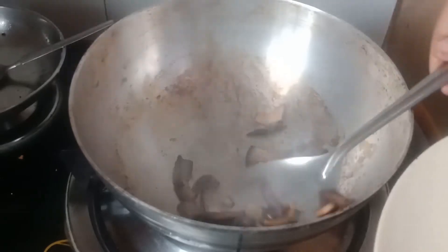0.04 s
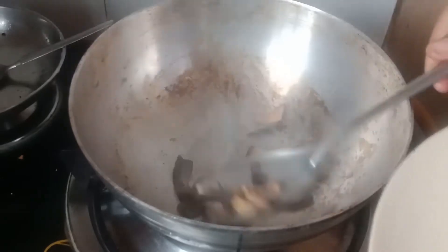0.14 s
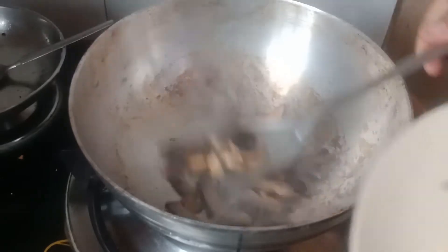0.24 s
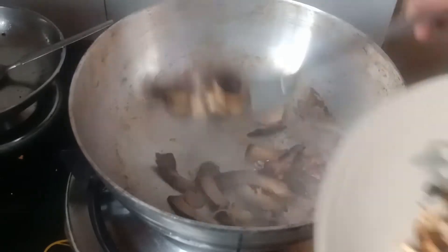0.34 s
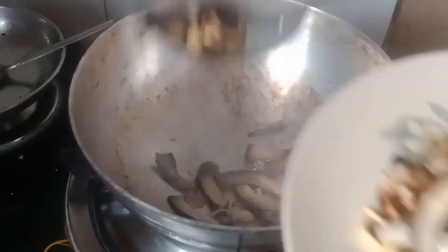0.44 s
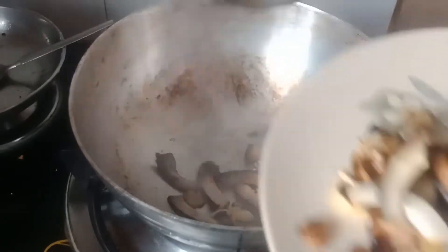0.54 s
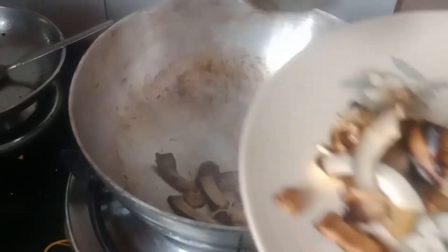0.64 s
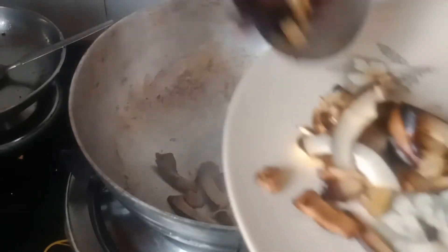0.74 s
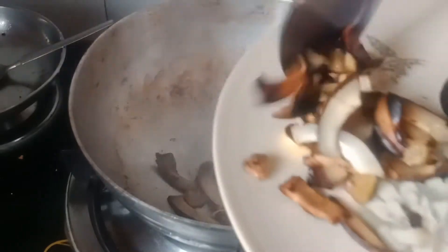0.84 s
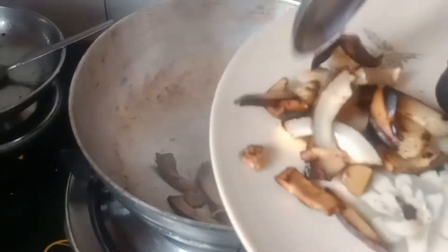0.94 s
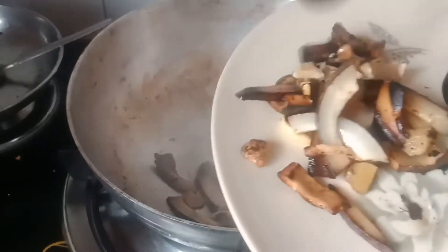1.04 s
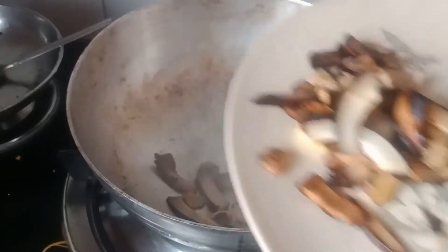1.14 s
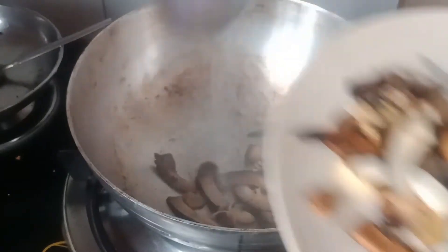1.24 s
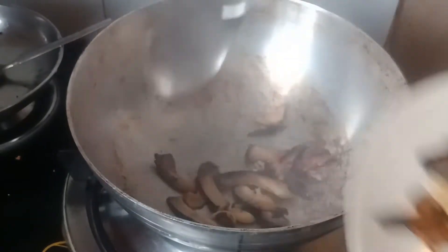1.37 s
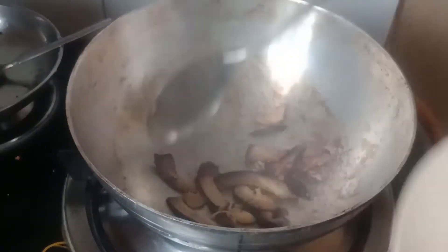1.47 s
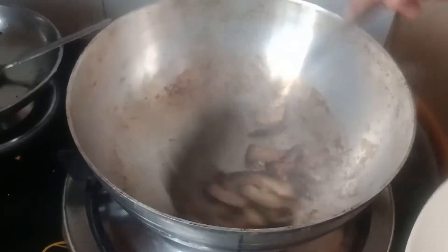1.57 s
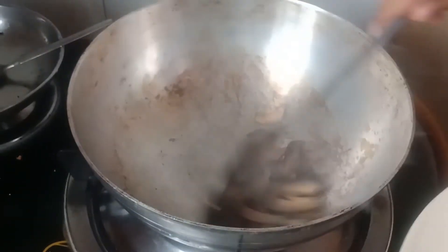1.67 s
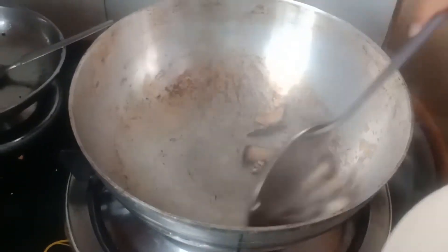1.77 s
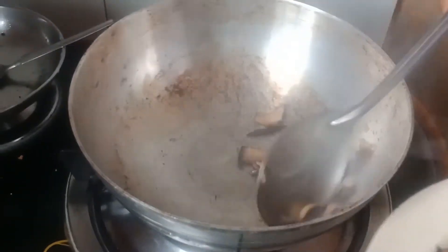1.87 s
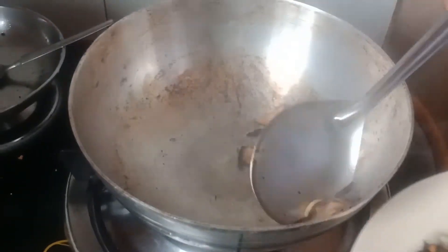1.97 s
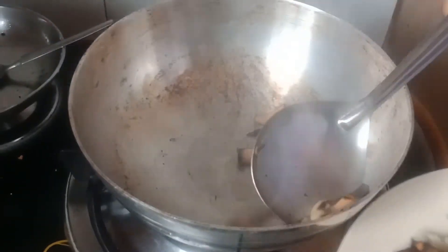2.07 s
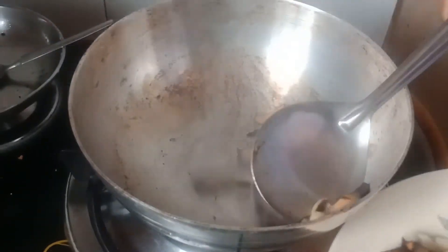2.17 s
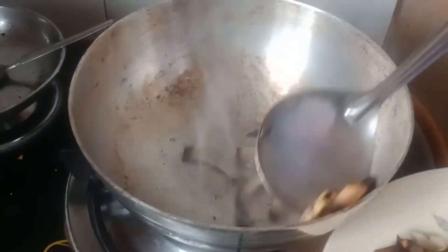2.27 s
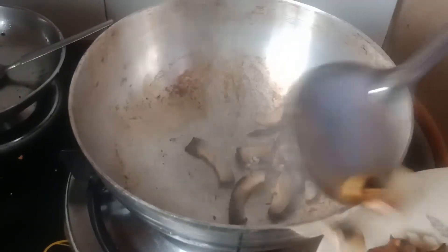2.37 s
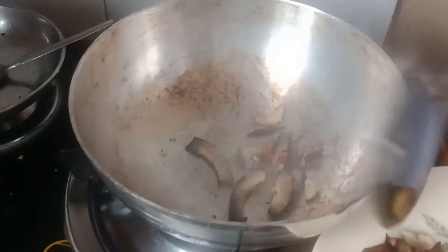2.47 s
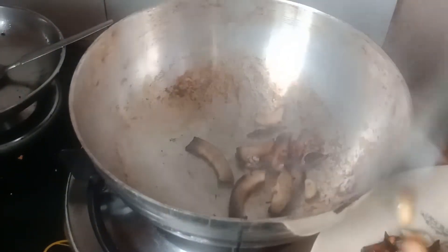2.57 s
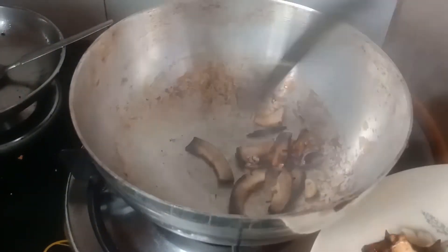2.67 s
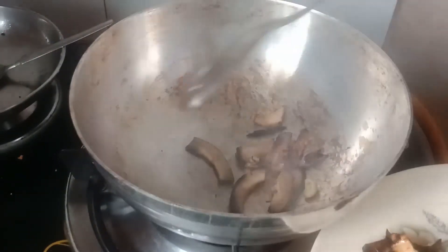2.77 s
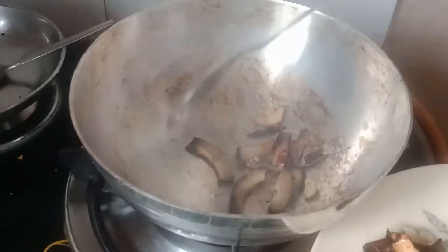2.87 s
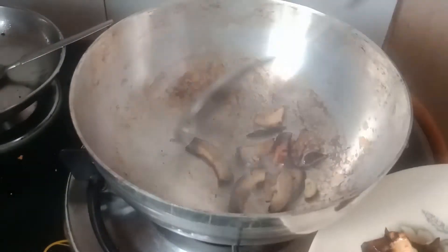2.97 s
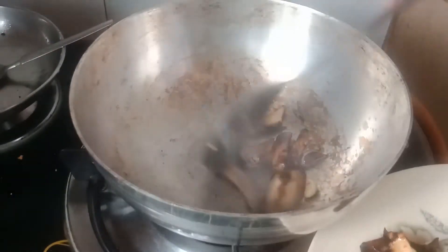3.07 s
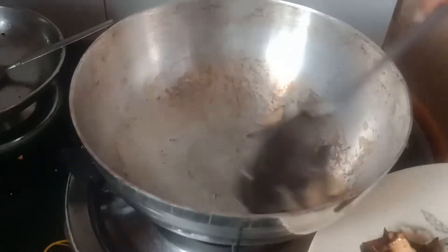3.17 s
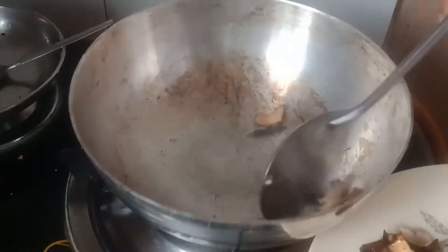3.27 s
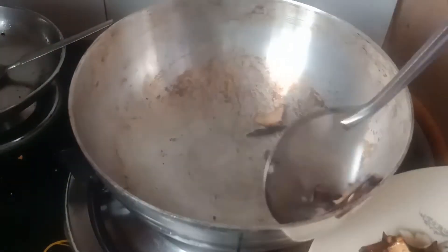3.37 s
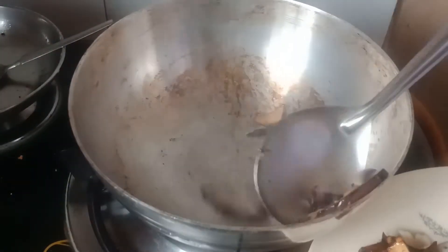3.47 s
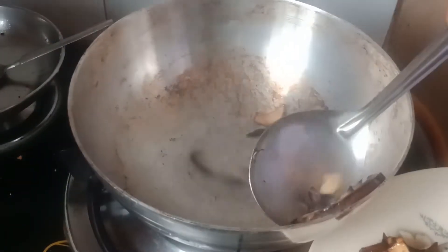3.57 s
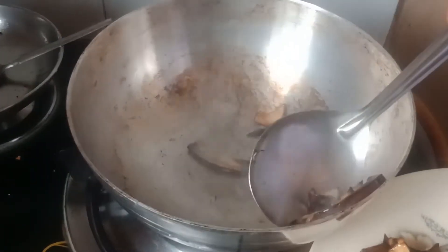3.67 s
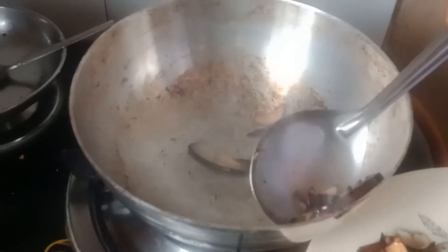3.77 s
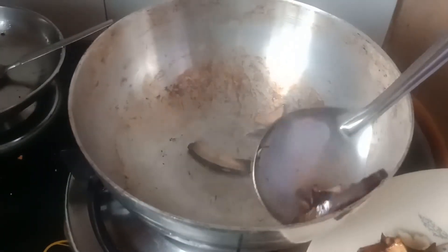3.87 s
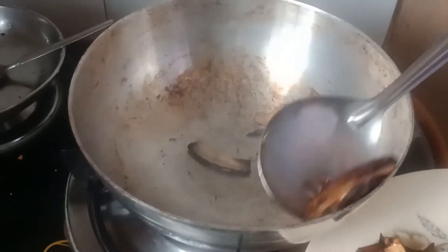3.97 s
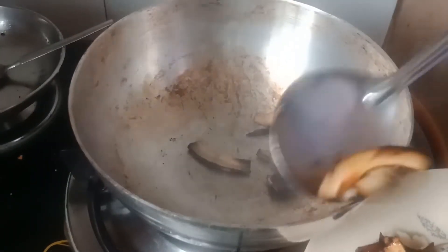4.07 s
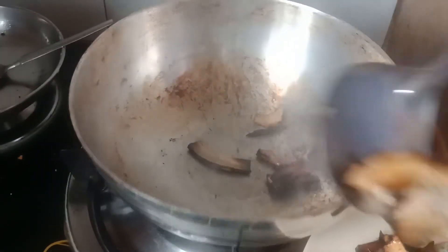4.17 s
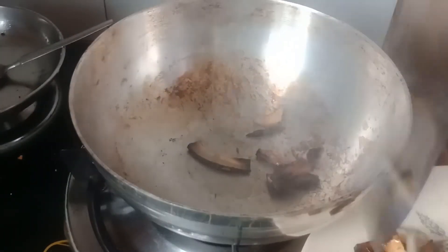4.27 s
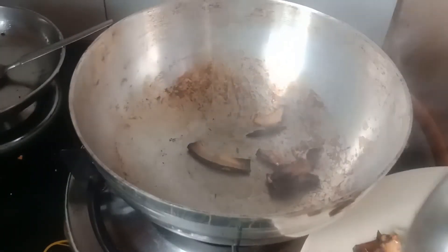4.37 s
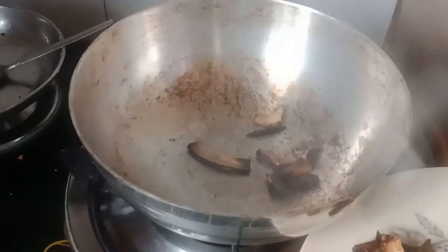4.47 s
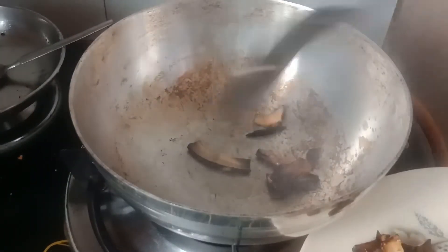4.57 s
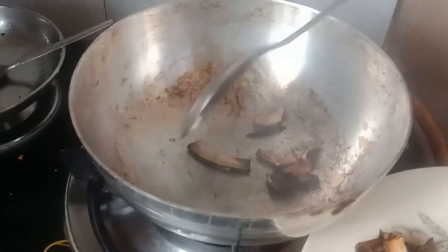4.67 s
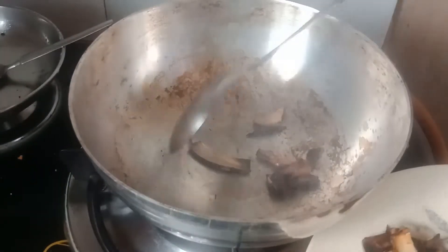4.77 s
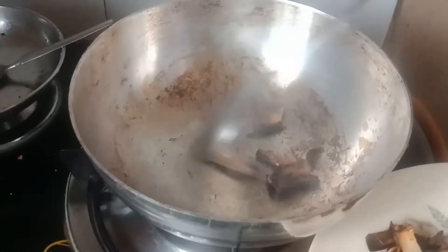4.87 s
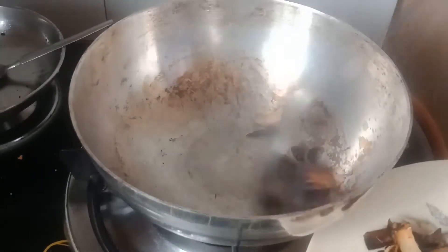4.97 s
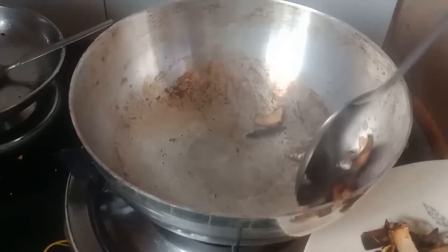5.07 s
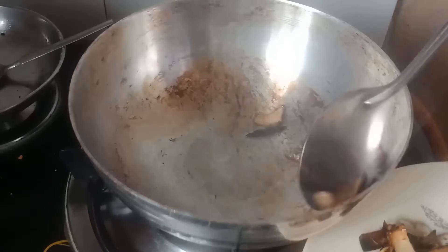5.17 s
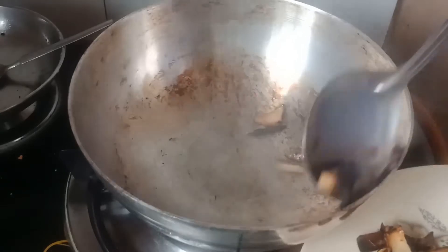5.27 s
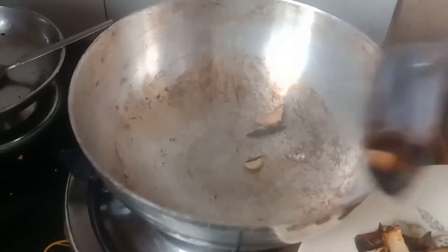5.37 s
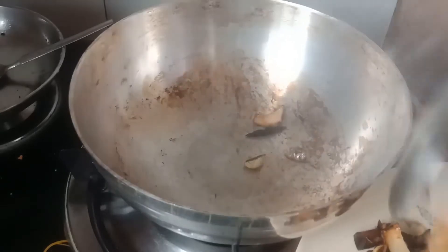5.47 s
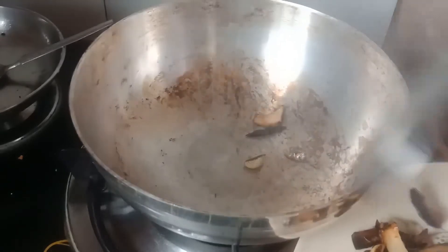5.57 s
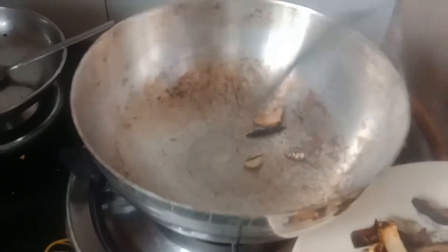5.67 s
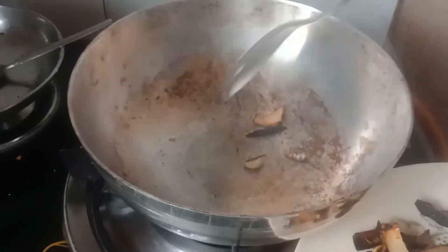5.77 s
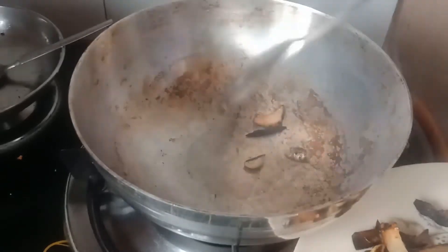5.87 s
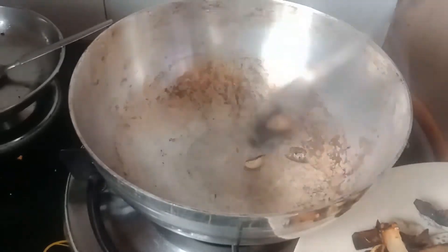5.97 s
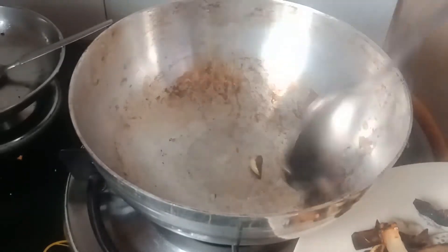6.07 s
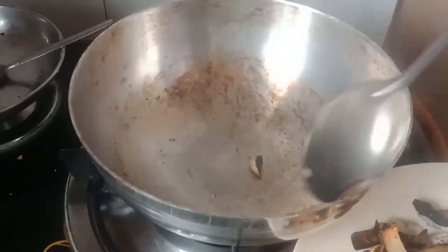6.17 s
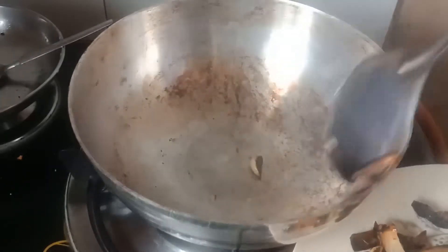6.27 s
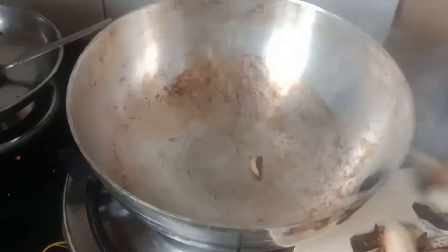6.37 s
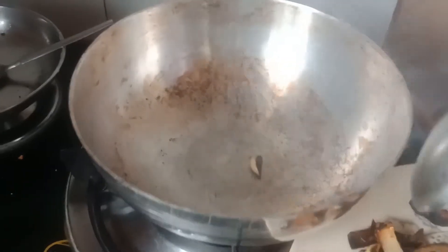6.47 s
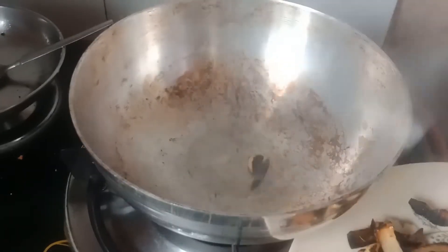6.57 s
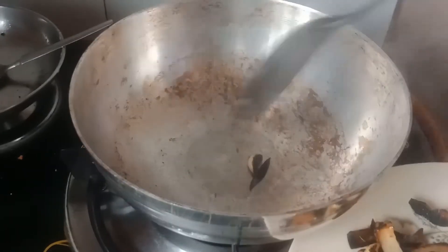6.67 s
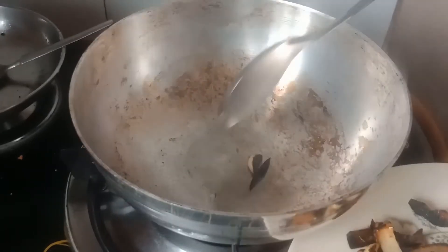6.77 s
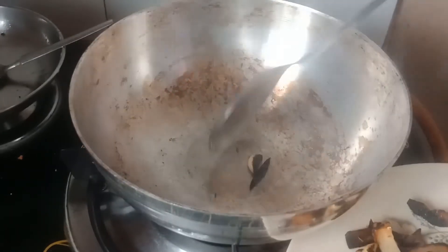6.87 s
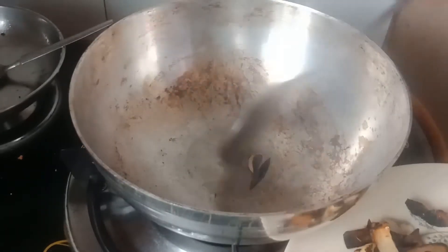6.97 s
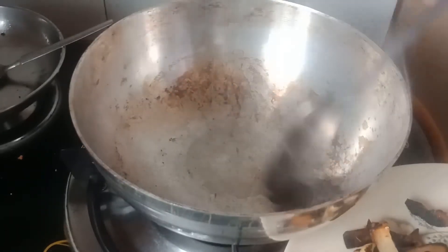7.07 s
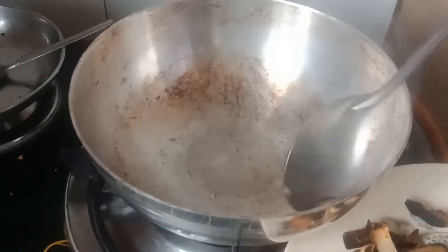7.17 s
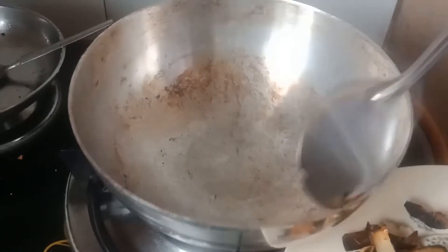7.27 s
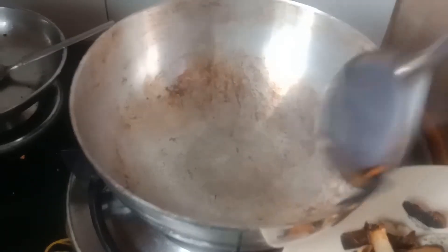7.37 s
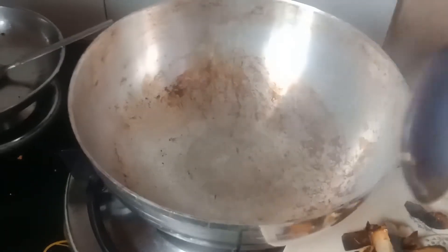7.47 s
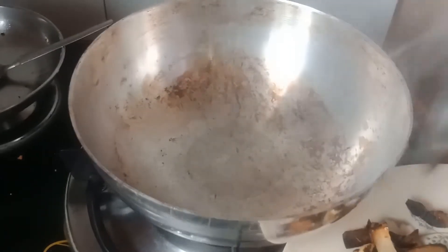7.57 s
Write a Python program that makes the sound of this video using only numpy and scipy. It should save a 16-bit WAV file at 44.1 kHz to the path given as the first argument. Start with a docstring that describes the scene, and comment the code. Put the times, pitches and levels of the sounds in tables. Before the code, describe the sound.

A metal utensil scrapes the bottom of a metal pan, recorded near in stereo with little room sound. After a soft opening scrape and a few light taps, seven seconds bring a series of strokes: sharp clank, stuttering rasp, upward metallic scratch, then a knock on the rim or a dull thud on a plate. Strokes grow busier and brighter around five to six seconds, and a final scrape fades into faint room hum.

```python
"""In a small kitchen, a steel spatula scrapes fried food out of a thin round metal pan.
Most strokes land with a clink, then the edge stutters over the crust: random slips and grit drive
the pan and blade, which ring briefly. A low pan tone rings at the opening; later drags climb in pitch.
Between strokes the spatula knocks on the rim and rattles to rest, and dull knocks set off a few
heavily damped plate modes. Under it all lies a quiet room hum of shaped noise."""
import sys
import numpy as np
from scipy import signal
from scipy.fft import rfft, irfft, next_fast_len
from scipy.io import wavfile

SR = 44100
rng = np.random.default_rng(int(sys.argv[2]) if len(sys.argv) > 2 else 0)


def convert_level_to_amplitude(level_db):
    """Map a level in decibels to its linear amplitude factor."""
    exponent = np.asarray(level_db, float) / 20
    return 10 ** exponent


def transcribe(u):
    """Save the signal u as a 16-bit wav file named by the first command-line argument.

    u: samples, shape (n,) or (channels, n), limited to [-1, 1]; the rate is SR.
    q: integer samples, one column per channel.
    """
    v = np.clip(np.atleast_2d(u).T, -1, 1)
    q = np.round(v * 32767).astype(np.int16)
    wavfile.write(sys.argv[1], SR, q)


N = 336914   # length in samples


def rms_one(x):
    """Scale to rms 1."""
    return x / np.sqrt(np.mean(x ** 2) + 1e-20)


def at_hz(points, hz):
    """Read a (frequency, value) table on a log frequency axis."""
    f, value = np.transpose(points)
    return np.interp(np.log(np.maximum(hz, 1)), np.log(np.maximum(f, 1)), value)


def drift(rate_hz):
    """A slow random wander of spread 1: noise smoothed by two equal poles, made at SR / 40."""
    pole = np.exp(-2 * np.pi * rate_hz * 40 / SR)
    noise = rng.standard_normal(N // 40 + 2002)
    slow = signal.lfilter([1], [1, -2 * pole, pole * pole], noise)[2000:]   # skip the start-up
    return np.interp(np.arange(N) / 40, np.arange(len(slow)), rms_one(slow))


def stereo(mid, side, width_db, lean_db):
    """Left and right spectra from mid and side; half the lean goes to each ear."""
    both = mid + convert_level_to_amplitude(width_db) * side * [[1], [-1]]
    return both * convert_level_to_amplitude(lean_db * np.array([[0.5], [-0.5]]))


def causal(gain):
    """The minimum-phase spectrum with this magnitude: nothing sounds early."""
    cepstrum = irfft(np.log(gain + 1e-6))
    cepstrum[1:len(gain) - 1] *= 2
    cepstrum[len(gain):] = 0
    return np.exp(rfft(cepstrum))


# colour of the room noise: (frequency [Hz], relative density [dB])
HUM_COLOUR = [(15, -73.5), (25, -36), (64, -21.5), (97, 3.5), (127, -8), (180, -4), (309, -15), (394, -7),
              (489, -17.5), (677, -11.5), (1130, -17.5), (1940, -18.5), (2160, -21), (3250, -21.5),
              (16000, -46)]
# how wide the room noise is: (frequency [Hz], side minus mid [dB])
HUM_WIDTH = [(60, -16), (110, -9.5), (200, -9), (380, -7), (700, -5), (1290, -1), (2380, -1.5),
             (4400, -0.5), (8120, -1.5), (15000, 0)]
HUM_DB = -60   # rms of the mid of the room noise, its slow wander included


def hum():
    """Coloured room noise that wanders slightly in level; its bass comes in quicker lumps."""
    hz = np.fft.rfftfreq(N, 1 / SR)
    mid, side = rfft(rng.standard_normal((2, N))) * convert_level_to_amplitude(at_hz(HUM_COLOUR, hz))
    air = irfft(stereo(mid, side, at_hz(HUM_WIDTH, hz), 0 * hz), N)
    bass = signal.sosfilt(signal.butter(2, 150, fs=SR, output="sos"), air)
    air = (air - bass) * convert_level_to_amplitude(1.1 * drift(1)) + bass * convert_level_to_amplitude(1.2 * drift(8))
    return convert_level_to_amplitude(HUM_DB) * air / np.std(air.mean(axis=0))


# dull knocks on the plate: (time [s], strength [dB])
KNOCKS = [(4.238, -24), (4.29, -4.5), (4.301, -8), (5.553, -5.5), (6.606, -4)]
# resonances of the plate: (frequency [Hz], width [Hz], level [dB])
PLATE_MODES = [(210, 14, -27), (565, 52, -8), (784, 51, -18)]


def plate():
    """A soft knock sets a few heavily damped modes going."""
    clicks, out = np.full(N, 1e-18), 0
    for s, strength_db in KNOCKS:
        clicks[int(s * SR)] = convert_level_to_amplitude(strength_db)
    for hz, width_hz, level_db in PLATE_MODES:
        r = np.exp(-np.pi * width_hz / SR)
        w = 2 * np.pi * hz / SR
        poles = [1, -2 * r * np.cos(w), r * r]
        out = out + signal.lfilter([0, convert_level_to_amplitude(level_db) * np.sin(w)], poles, clicks)
    return signal.sosfilt(signal.butter(2, [150, 1000], "band", fs=SR, output="sos"), out)


SLIPS_PER_S, SLIP_SPREAD_DB = 300, 3   # typical rate and spread of the slips
GRIT_DB = -1   # grit relative to slips


def stutter():
    """The edge sticks and slips over the crust in clumps, on a bed of fine grit."""
    sizes = convert_level_to_amplitude(SLIP_SPREAD_DB * np.minimum(rng.exponential(1, N), 4)) * rng.choice([-1, 1], N)
    chance = SLIPS_PER_S * convert_level_to_amplitude(3.0 * drift(25)) / SR
    slips = sizes * (rng.random(N) < chance)
    return rms_one(rms_one(slips) + convert_level_to_amplitude(GRIT_DB) * rng.standard_normal(N))


# first row: a low pan tone rings as the sound opens;
# the others: the edge drags and its scratch climbs in pitch:
# (start [s], end [s], from [Hz], to [Hz], peak level [dB], sharpness [Q])
DRAGS = [(0, 0.15, 444, 454, -38.5, 41), (1.736, 1.86, 1490, 2180, -38, 3.7),
         (3.425, 3.556, 2480, 2720, -35, 5.4), (3.955, 4.216, 1730, 4600, -39, 2.5),
         (5.108, 5.182, 2300, 2900, -25, 3), (5.217, 5.287, 2530, 2900, -26, 3.2),
         (6.168, 6.367, 2040, 3490, -22.5, 4.4), (7.199, 7.488, 1900, 4770, -25, 9)]
# where in its length a row peaks, and how far below the peak it starts and ends
DRAG_PEAK_SHARE, DRAG_RISE_DB, DRAG_FALL_DB = 0.6, 15.5, 11.5
RIGHT_EAR_DELAY_S = 0.0004


def drags(force):
    """The stutter rings a resonance whose centre glides from one pitch to another; the right ear lags."""
    out = np.zeros(N)
    for start, end, from_hz, to_hz, peak_db, sharpness in DRAGS:
        state = np.zeros(2)
        for i in range(int(start * SR), int(end * SR), 128):   # retuned every 128 samples
            way = np.clip((i / SR - start) / (end - start), 0, 1)
            hz = from_hz * (to_hz / from_hz) ** way
            r = np.exp(-np.pi * hz / sharpness / SR)
            fade = min(1, (i / SR - start) / 0.016, (end - i / SR) / 0.035)
            below_peak_db = np.interp(way, [0, DRAG_PEAK_SHARE, 1], [DRAG_RISE_DB, 0, DRAG_FALL_DB])
            # the root keeps the loudness alike for every sharpness
            gain = max(fade, 0) * convert_level_to_amplitude(peak_db - below_peak_db) * np.sqrt((1 - r * r) / 2)
            poles = [1, -2 * r * np.cos(2 * np.pi * hz / SR), r * r]
            piece = force[i:i + 128]
            out[i:i + 128], state = signal.lfilter([gain, 0, -gain], poles, piece, zi=state)
    out = signal.sosfilt(signal.butter(2, [400, 6000], "band", fs=SR, output="sos"), out)
    return np.array([out, np.roll(out, int(RIGHT_EAR_DELAY_S * SR))])


BOTTOM_DB, BOTTOM_FOLLOWS_BOWL = -7, 0.23   # the flat bottom under a scrape
EDGE_DB, EDGE_FOLLOWS_RASP, EDGE_FOLLOWS_BLADE = -6.5, 0.3, 0.26   # the fine hiss of the edge


def part_levels(wall_db, rasp_db, bowl_db, blade_db):
    """Drive in dB of bottom, bowl, wall, rasp, blade and edge; all but the wall given relative to it."""
    bottom_db = BOTTOM_DB + BOTTOM_FOLLOWS_BOWL * bowl_db
    edge_db = EDGE_DB + EDGE_FOLLOWS_RASP * rasp_db + EDGE_FOLLOWS_BLADE * blade_db
    return wall_db + np.array([bottom_db, bowl_db, 0 * wall_db, rasp_db, blade_db, edge_db])


# scrapes, a list of points for each stroke:
# (time [s], wall level [dB], then above the wall: rasp [dB], bowl [dB], blade [dB])
STROKES = [
    [(0.0, -41, 1, 1, -4), (0.016, -52, -5, 13, -3), (0.036, -51.5, 3, 9, 0), (0.102, -56.5, 8, 7, -14.5),
     (0.108, -54.5, -8, -7, -14), (0.162, -68, -5, 8, -3), (0.174, -59, -9, 0, -14),
     (0.192, -84, -4, 14, 1), (0.2, -73, -13, 3, -10)],
    [(1.6, -29.5, -9, -12, -15), (1.632, -34, -5, -2, 7), (1.718, -31.5, -17, -10, 0),
     (1.732, -33, -20, 0, 10), (1.75, -27.5, -17, -6.5, -3), (1.784, -19, 0.5, -23, -32),
     (1.804, -26.5, -0.5, -7, -23), (1.936, -53, -0.5, -9, -20.5), (2.02, -64.5, 2, 0, -3)],
    [(3.02, -26.5, -17, -10, -4), (3.122, -26.5, -3, -13.5, 0), (3.222, -27, 1, -9, 5),
     (3.244, -31.5, -3.5, -5, 15), (3.338, -22, -2, -9, -10), (3.38, -30, 2.5, 2, -22.5),
     (3.5, -29.5, 10.5, -3.5, -2), (3.534, -31, 1.5, 2.5, -34.5), (3.72, -71.5, -8, -12, -3)],
    [(3.92, -55.5, -12, -9.5, -22), (4.018, -41, 6, 6.5, -14), (4.052, -40, 7.5, 2, -2.5),
     (4.142, -37.5, 0, -2, 0), (4.182, -47, 15, 8, 3), (4.194, -49.5, -5, -6, -10), (4.226, -53.5, 5, 8, 0),
     (4.24, -42.5, -13, 4, -12), (4.27, -61.5, 3, 12, 8)],
    [(4.885, -26, -11.5, -10, -5), (4.911, -34, -9, -5, 7.5), (5.001, -27, 6, -20.5, 1.5),
     (5.051, -38.5, 3, -2, 17.5), (5.117, -21, 3, -9.5, -5), (5.199, -39.5, 8, 12, -9.5),
     (5.235, -28.5, 13, -1, -1.5), (5.381, -43.5, -19, 4.5, -13.5), (5.4, -43.5, -4, -1, -14)],
    [(5.963, -29.5, -5.5, -12, -9), (6.007, -26, -1.5, -4, -25.5), (6.075, -29.5, -12, -7.5, -4),
     (6.149, -27.5, -1.5, -7, -20), (6.243, -27, 14.5, 9, -1), (6.305, -35.5, 13, 2.5, 4.5),
     (6.443, -67.5, 8, 13, 4.5), (6.455, -46, -8, 5, -16), (6.56, -75.5, 8, 12, -7)],
    [(7.005, -32, 2, -8, 9.5), (7.033, -35, 6.5, -8, 6.5), (7.065, -31.5, 0.5, -26, -4),
     (7.149, -34, -2.5, -2, 6), (7.245, -32, 10, 5, -13.5), (7.301, -29.5, 10.5, 1, -2),
     (7.409, -33, 6, 2, 2), (7.531, -50.5, -2, 6.5, -4), (7.64, -106, 12, 2, 0)],
]
# after a knock the spatula rattles and slides to rest:
# (start [s], length [s], wall level [dB], fall [dB per s], rasp above wall [dB], bowl above wall [dB])
RATTLES = [(2.065, 0.07, -64.5, 42, 5.5, 1.5), (2.438, 0.18, -54, 39, -5, 2),
           (2.73, 0.097, -47, 68, -8, 2.5), (2.842, .15, -47, 103, -11, 1),
           (4.289, 0.24, -28.5, 191.5, -9.5, 4.5), (5.416, 0.11, -46.5, 228, 5.5, 18.5),
           (5.533, 0.029, -33.5, 26, -6, 4), (5.564, 0.3, -32.5, 130, -9.5, 0),
           (6.577, 0.027, -48.5, 20, -5, 7), (6.609, 0.21, -28, 196, -15, -0.5)]
RATTLE_BLADE_BELOW_RASP_DB = 7.5


def pressure():
    """Drive of each part over time; nothing while the spatula is in the air."""
    t, out = np.arange(N) / SR, np.zeros((len(PARTS), N))
    rattles = []
    for start, length, db, fall, rasp_db, bowl_db in RATTLES:
        blade_db = rasp_db - RATTLE_BLADE_BELOW_RASP_DB
        rattles.append([(start + late_s, db - fall * late_s, rasp_db, bowl_db, blade_db)
                        for late_s in (0, length)])
    for stroke in STROKES + rattles:
        s, *levels = np.transpose(stroke)
        inside = (t >= s[0]) & (t <= s[-1])
        out[:, inside] += convert_level_to_amplitude(part_levels(*[np.interp(t[inside], s, db) for db in levels]))
    return out


# clear resonances of the pan: (frequency [Hz], width [Hz], level [dB])
PAN_MODES = [(186, 20, -20), (239, 16, -4), (288, 12, -3), (381, 13, 0), (455, 14, -10), (553, 18, -8),
             (608, 16, -8), (675, 20, -9), (770, 20, -10), (845, 18, -8), (948, 16, -9), (1050, 25, -11),
             (1115, 25, -12), (1413, 25, -13), (1500, 22, -12), (1590, 20, -8), (1618, 20, -8),
             (1752, 25, -12), (1915, 25, -11), (2186, 25, -10), (2430, 20, -10), (2590, 25, -12),
             (2750, 25, -10), (3700, 40, -20), (4290, 60, -24), (6490, 45, -27), (7030, 45, -30),
             (7930, 32, -37), (8470, 60, -41), (10400, 45, -43)]
# clear resonances of the blade: (frequency [Hz], width [Hz], level [dB])
BLADE_MODES = [(2046, 30, -6), (2997, 25, -15), (3148, 18, 0), (3211, 16, -4), (3297, 20, -12),
               (3342, 20, -10), (4920, 40, -11), (5700, 40, -23), (6840, 45, -27), (9500, 50, -41),
               (9840, 40, -42), (11500, 50, -50), (12600, 50, -49), (13700, 50, -50), (14400, 60, -46),
               (14900, 50, -47)]
# colour of the metal's dense ring: (frequency [Hz], relative density [dB])
METAL_COLOUR = [(88, -54.5), (150, -20.5), (285, -20.5), (339, -7.5), (381, -4.5), (500, 0), (1320, -14),
                (1610, -3), (2600, -8), (3230, -11), (3850, -27), (4960, -18), (15600, -56.5)]
# how wide the metal sounds: (frequency [Hz], side minus mid [dB])
METAL_WIDTH = [(60, -17), (110, -9), (200, -40.5), (380, -4.5), (700, -5), (1290, 3), (2380, -1.5),
               (4400, 0), (8120, -1), (15000, 6)]
# which ear the metal leans to: (frequency [Hz], left minus right [dB])
METAL_LEAN = [(60, 5.5), (110, -9), (200, 3), (380, -2), (700, 2.5), (1290, -2), (2380, 0.5), (4400, -3),
              (8120, -5), (15000, -12.5)]
MODE_SPREAD_DB, MODE_RISE_CYCLES = 3.5, 0.92   # chance in mode level; how slowly a mode swells


def response(modes, low_hz, high_hz, tick_db, crack_t60, ring_t60, ring_db, mode_db):
    """What one touch sets off in a part: tick, crack, haze of dense modes and clear modes; energy 1."""
    t = np.arange(SR // 2) / SR
    hz = np.fft.rfftfreq(len(t), 1 / SR)
    band = 1 / np.sqrt((1 + (low_hz / (hz + 1)) ** 10) * (1 + (hz / high_hz) ** 16))
    decay = convert_level_to_amplitude(-60 * t / crack_t60) + convert_level_to_amplitude(ring_db - 60 * t / ring_t60)
    burst = rng.standard_normal((2, len(t))) * decay
    burst[:, 0] = convert_level_to_amplitude(tick_db) * np.array([1, 0.3])   # the tick, mid and side
    mid, side = rfft(burst) * causal(band * convert_level_to_amplitude(at_hz(METAL_COLOUR, hz)))
    dense = irfft(stereo(mid, side, at_hz(METAL_WIDTH, hz), at_hz(METAL_LEAN, hz)), len(t))
    clear = np.zeros_like(dense)
    for f, width_hz, level_db in modes:
        if modes is BLADE_MODES or low_hz <= f < high_hz:
            # a mode reaches the two ears out of phase
            turn = np.arctan(convert_level_to_amplitude(at_hz(METAL_WIDTH, f))) * rng.choice([-1, 1]) * np.array([[1], [-1]])
            lean_db = at_hz(METAL_LEAN, f) * np.array([[0.5], [-0.5]])
            height = convert_level_to_amplitude(level_db + MODE_SPREAD_DB * rng.standard_normal() + lean_db)
            swell = (1 - np.exp(-t * f / MODE_RISE_CYCLES)) ** 2 * np.exp(-np.pi * width_hz * t)
            # a wide mode needs more height for the same spectral peak
            clear += height * width_hz * swell * np.sin(2 * np.pi * f * t + turn)
    both = rms_one(dense) + convert_level_to_amplitude(mode_db) * rms_one(clear)
    return rms_one(both) / np.sqrt(len(t))


# the vibrating parts, in the order bottom, bowl, wall, rasp, blade, edge: (from [Hz], to [Hz], tick [dB],
# crack t60 [s], ring t60 [s], ring against crack [dB], modes against haze [dB], extra drive of a hit [dB])
PARTS = [(198, 290, 25.5, 0.075, 0.16, -19.5, 16.5, 12), (380, 498, 15.5, 0.029, 0.28, 11, 8, 14.5),
         (563, 1400, 28, 0.029, 0.26, -5.5, -3, 15.5), (1410, 2747, 17, 0.046, 0.19, -8.5, -1, 17.5),
         (2900, 3900, 6, 0.0074, 0.08, -3.5, 2.5, 21.5), (2900, 45000, 10, 0.0022, 0.19, -12, -8, 16)]
# clinks and knocks: (time [s], wall level [dB], edge level [dB], bowl level [dB], blade level [dB])
HITS = [(0.0907, -31, -30, -68, -47), (0.7349, -45.5, -45.5, -47, -68), (0.9287, -46, -60, -52, -69),
        (1.0101, -41, -64, -49, -61), (1.0859, -47, -51, -59, -55), (1.5874, -12, -20, -16.5, -27),
        (1.8477, -52, -35, -56, -50), (2.0621, -43, -44, -66, -60), (2.4219, -32.5, -50, -35.5, -60),
        (2.5973, -41, -42, -62, -42), (2.7323, -42, -66.5, -26.5, -52), (2.83, -33, -51.5, -43, -49),
        (3.0074, -5.5, -12.5, -18, -15), (3.054, -23, -22.5, -34, -13), (3.1736, -12, -39, -33.5, -13.5),
        (3.4393, -22, -22, -27, -28), (4.173, -35, -20.5, -49.5, -28), (4.2821, -21, -31.5, -14.5, -35),
        (4.3913, -19, -32, -35, -40), (4.4589, -32, -47, -60, -46), (4.8715, -8, -14, -29.5, -8.5),
        (5.0485, -14.5, -33.5, -50, -9.5), (5.1997, -46, -19.5, -46, -37), (5.3426, -19, -37, -20.5, -52),
        (5.4116, -21, -13.5, -28, -20.5), (5.5268, -29, -43.5, -28.5, -36), (5.634, -26.5, -31, -47, -28.5),
        (5.7397, -35, -54.5, -39, -68), (5.872, -42.5, -54, -55.5, -56), (5.909, -36, -55, -52, -57),
        (5.9497, -4, -15, -15.5, -17), (6.0274, -11, -30.5, -32, -36.5), (6.0618, -16.5, -36, -32, -21),
        (6.119, -14, -39.5, -28, -29.5), (6.1614, -11.5, -22, -24.5, -37), (6.1975, -14.5, -21, -32, -23.5),
        (6.2513, -28, -24.5, -11.5, -14.5), (6.5743, -27, -31, -29, -48), (6.994, -13, -24.5, -50.5, -13)]
HIT_RASP_DB, HIT_RASP_FROM_EDGE = -4.5, 0.34   # a hit's rasp: a mix of wall and edge, then lowered
PLACES = 3


def spatula():
    """Slips and hits drive pan and blade; the touch wanders between places that ring differently."""
    size = next_fast_len(N + SR // 2)
    s, wall_db, edge_db, bowl_db, blade_db = np.transpose(HITS)
    at = (s * SR).astype(int)
    rasp_db = HIT_RASP_DB + wall_db + HIT_RASP_FROM_EDGE * (edge_db - wall_db)
    hit_db = [bowl_db, bowl_db, wall_db, rasp_db, blade_db, edge_db]   # the bottom is hit like the bowl
    near = np.array([convert_level_to_amplitude(14.4 * drift(11.5)) for place in range(PLACES)])
    near /= np.sqrt(np.sum(near ** 2, axis=0))   # shares keep the total power
    slips = stutter()
    drive, out = pressure() * slips, 0
    for part, force, strength_db in zip(PARTS, drive, hit_db):
        *ringing, hit_extra_db = part
        modes = BLADE_MODES if part is PARTS[4] else PAN_MODES
        force = force.copy()
        force[at] += convert_level_to_amplitude(strength_db + hit_extra_db)
        for share in near:
            out = out + rfft(force * share, size) * rfft(response(modes, *ringing), size)
    return irfft(out, size)[:, :N] + drags(slips)


def scene():
    """Spatula and plate over room hum."""
    return spatula() + plate() + hum()


def top_cut(x):
    """Nothing passes above the cut-off."""
    return signal.sosfilt(signal.butter(12, 16490, fs=SR, output="sos"), x)


def record(dry):
    """Loud peaks are rounded off smoothly."""
    mix = 1.402 * np.tanh(dry / 1.61)
    return top_cut(mix)


dry = scene()
out = record(dry)
transcribe(out)
```